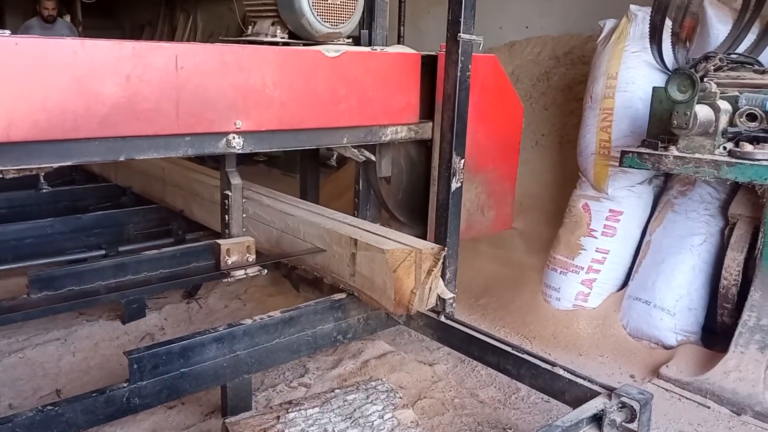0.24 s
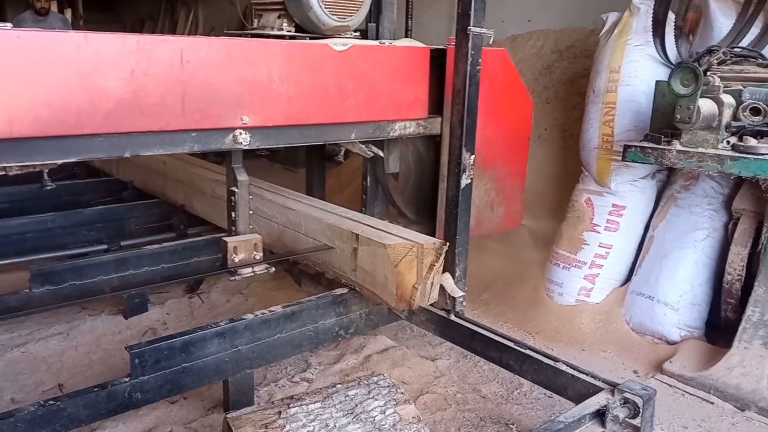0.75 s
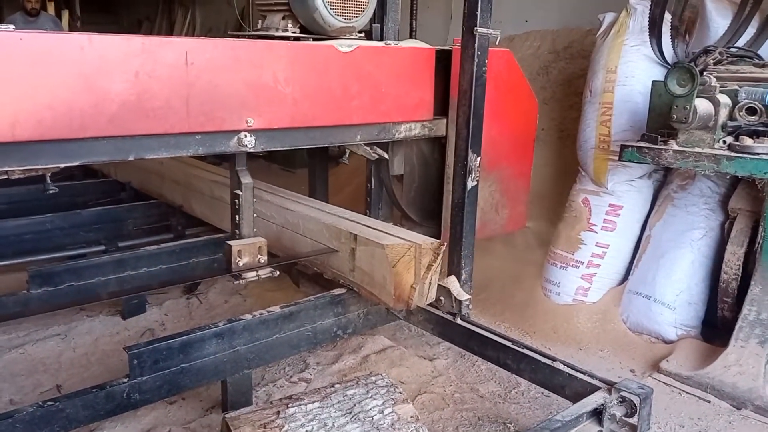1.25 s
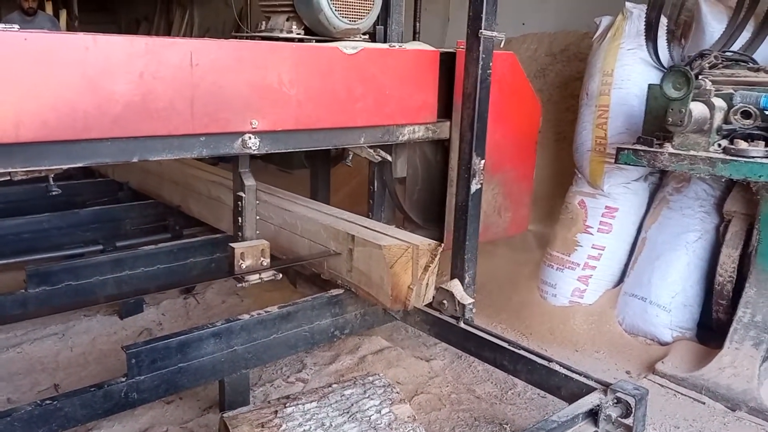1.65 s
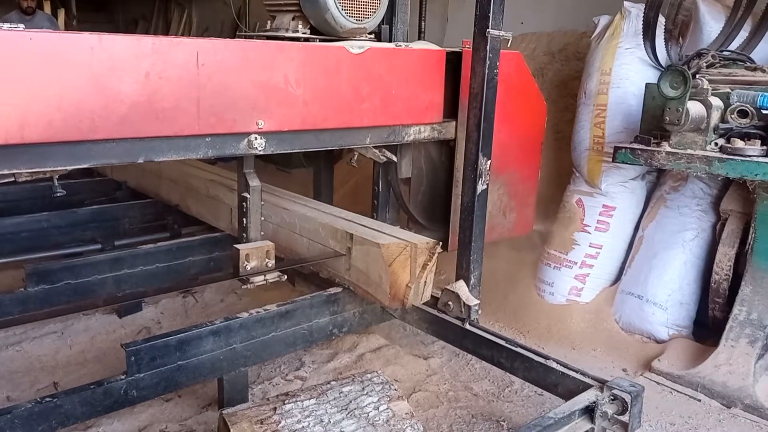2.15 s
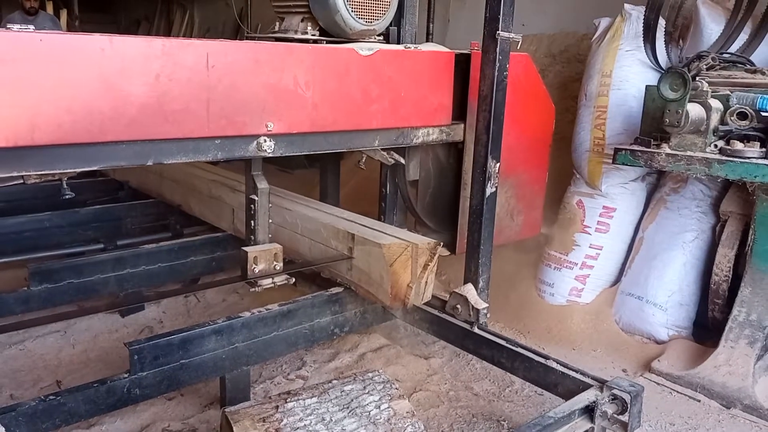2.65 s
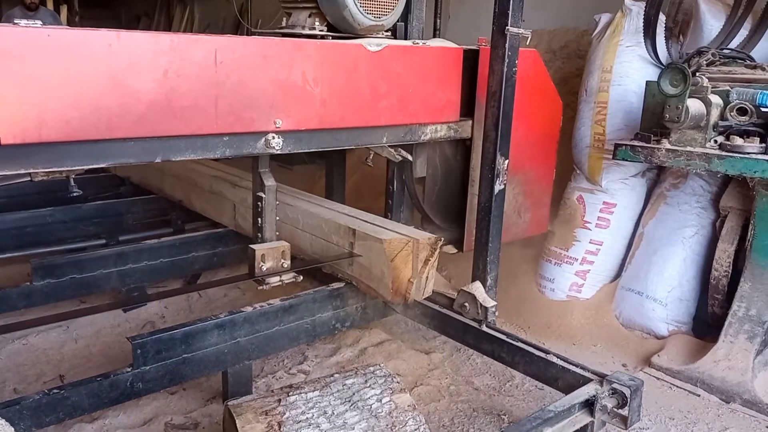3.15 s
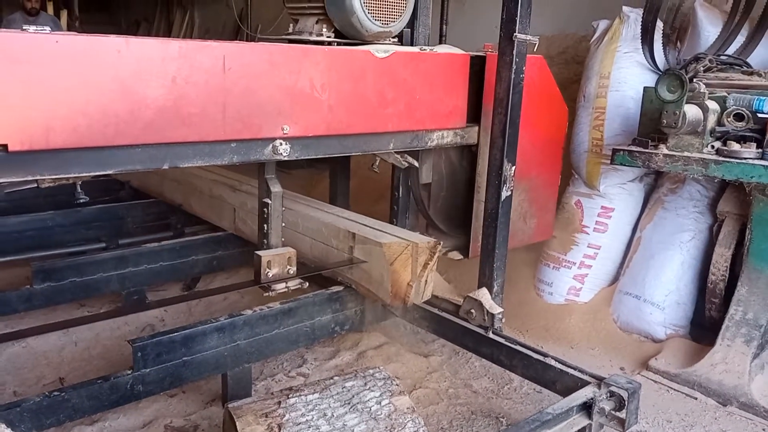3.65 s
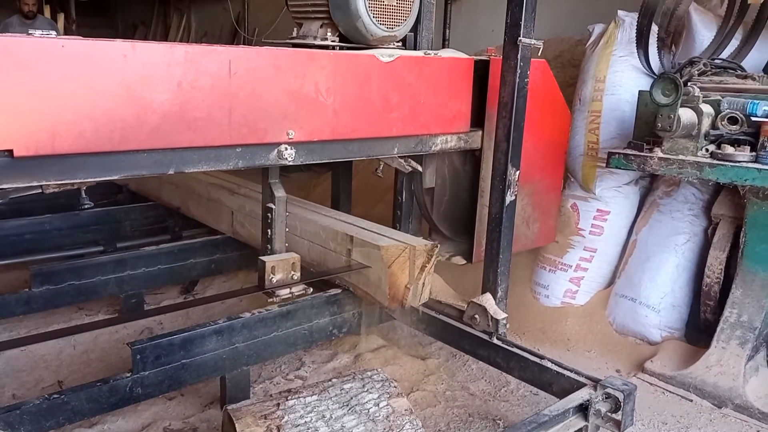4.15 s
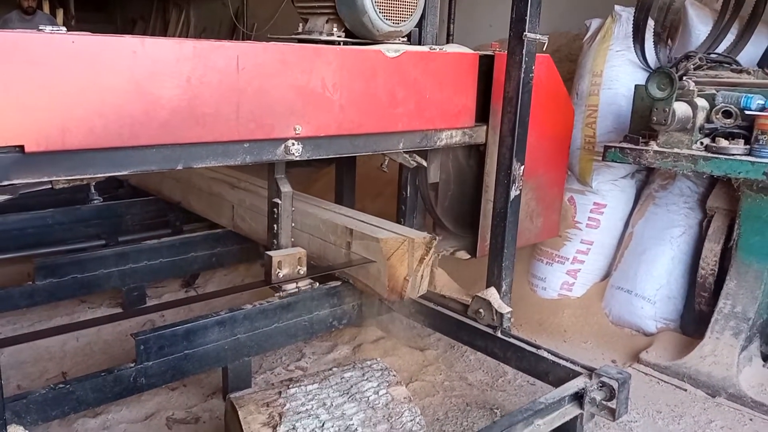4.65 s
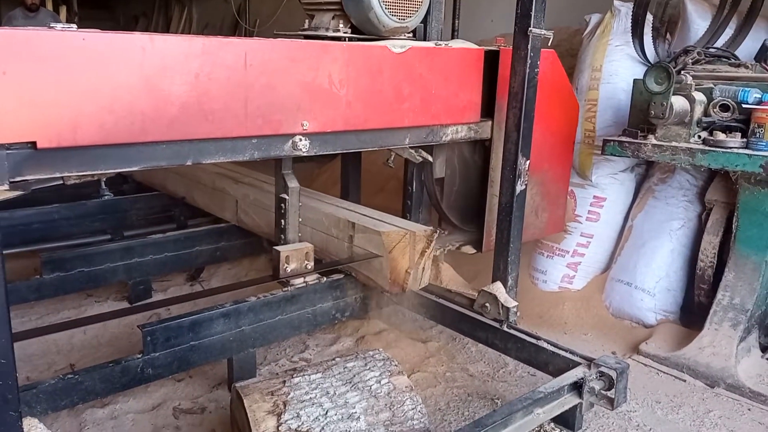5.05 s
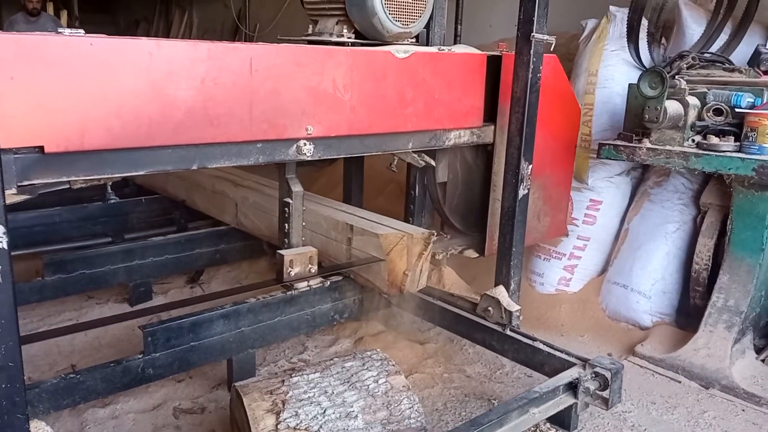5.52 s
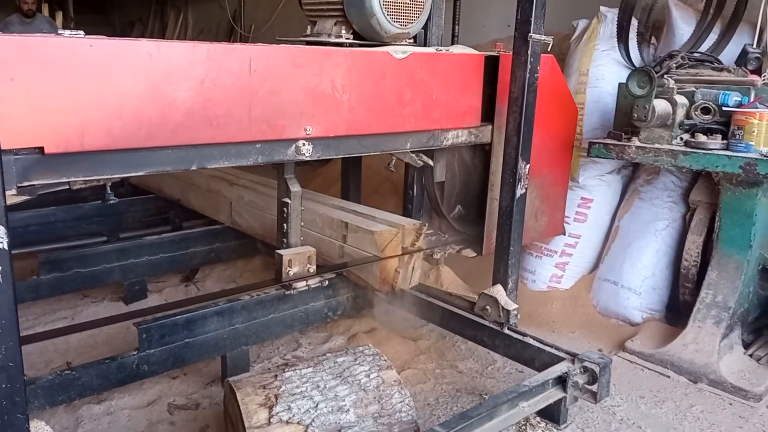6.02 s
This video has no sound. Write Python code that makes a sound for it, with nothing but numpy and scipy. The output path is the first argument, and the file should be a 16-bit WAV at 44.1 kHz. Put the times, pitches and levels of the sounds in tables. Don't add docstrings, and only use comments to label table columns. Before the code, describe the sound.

Constant loud band saw noise, close and nearly mono: harsh rough hiss, flickering high squeals, a nasal metallic ring from the wheel guard, and rumbling motor beneath. The cut stays steady, then gets sharper and more sizzling as the wood thins. It swells as the log splits, and in the last instant the pitch rises slightly, the fine hiss fades and the freed blade flutters.

```python
import sys
import numpy as np
from scipy import signal
from scipy.fft import rfft, irfft
from scipy.io import wavfile
from scipy.ndimage import uniform_filter1d, map_coordinates

SR = 44100
rng = np.random.default_rng(int(sys.argv[2]) if len(sys.argv) > 2 else 0)


def persist_wave(psi):
    counts = np.round(np.clip(psi, -1, 1) * 32767).astype(np.int16)
    wavfile.write(sys.argv[1], SR, np.atleast_2d(counts).T)


def attenuation_scalar(level_db):
    decades = np.asarray(level_db, float) / 20
    return 10 ** decades


N = 276948
TIME = np.arange(N) / SR
CONTROL_STEP = 32
TEETH_PER_TURN = 34.15
THINNING_S, BREAKOUT_S, EXIT_S = (2.7, 4.3), (5.65, 5.95), 6.01


def rms_one(x):
    return x / np.sqrt(np.mean(x ** 2) + 1e-20)


def in_time(rows):
    s, value = np.transpose(rows)
    return np.interp(TIME, s, value)


def at_hz(points, hz):
    point_hz, level_db = np.transpose(points)
    return np.interp(np.log(hz), np.log(point_hz), level_db)


def smooth(slow):
    return np.interp(np.arange(N) / CONTROL_STEP, np.arange(len(slow)), slow)


def drift(rate):
    warm_up = 2000
    r = np.exp(-2 * CONTROL_STEP * np.pi * rate / SR)
    noise = rng.standard_normal(N // CONTROL_STEP + 2 + warm_up)
    return rms_one(signal.lfilter([1], [1, -2 * r, r * r], noise)[warm_up:])


def swells(rows):
    t = np.arange(N // CONTROL_STEP + 2) * CONTROL_STEP / SR
    return smooth(sum(db * np.exp(-(2 * (t - s) / length) ** 4) for s, length, db in rows))


def ramp(start_s, end_s):
    return np.clip((TIME - start_s) / (end_s - start_s), 0, 1)


def along_cut(steady_db, thin_db, breakout_db, fall_db_per_s):
    inside_db = steady_db + thin_db * ramp(*THINNING_S) + breakout_db * ramp(*BREAKOUT_S)
    return inside_db - fall_db_per_s * np.maximum(TIME - EXIT_S, 0)


def coloured(x, spectrum):
    hz = np.maximum(np.fft.rfftfreq(N, 1 / SR), 1)
    return irfft(rfft(x) * attenuation_scalar(at_hz(spectrum, hz)), N)


def band(x, low_hz, high_hz):
    return signal.sosfilt(signal.butter(3, [low_hz, high_hz], "band", fs=SR, output="sos"), x)


def resonate(x, hz, width_hz):
    r = np.exp(-np.pi * width_hz / SR)
    poles = [1, -2 * r * np.cos(2 * np.pi * hz / SR), r * r]
    return signal.lfilter([(1 - r * r) / 2, 0, (r * r - 1) / 2], poles, x)


def resonate_twice(x, hz, width_hz):
    return resonate(resonate(x, hz, width_hz), hz, width_hz)


def wheel_turns(per_s):
    return np.cumsum(per_s) / SR / TEETH_PER_TURN


# pitch_hz, level_db.
FIBRES = [(880, -28), (1500, 1.5), (2080, -2), (2550, -8), (2660, -9), (2860, -7.5), (3210, -6.5),
          (3430, -3.5), (3780, -1), (4530, -5), (5380, -6), (6930, -2.5), (8090, -6.5), (9150, -2.5),
          (10600, -9.5), (13800, -41), (22000, -120)]
DUST = [(10900, -10), (11300, -7.5), (12000, -9), (12850, -8), (13050, -15), (13600, -16), (14100, -12),
        (14800, -9.5), (15700, -3.5), (16500, -3.5)]
HISS = FIBRES[:-3] + [(10550, -9.0)] + DUST
# pitch_hz, level_db.
TOOTH_OVER_HISS = [(600, 17), (1700, 15.5), (2500, 16), (3500, 17), (6000, 20), (9000, 21.5), (11000, 26),
                   (13500, 27), (15500, 26)]
STRONG_PARTIALS = {2: 2.5, 8: 13.2, 10: -3.1, 11: 2.7, 12: 6.1, 14: 5.5, 22: 11.3, 25: 4.1, 26: 6.7, 27:
                   1.1, 30: 1.9, 37: 1}
BURSTS = {8: [(.23, 0.21, 8), (.55, .15, -4), (.745, 0.057, 7), (.84, 0.058, 8), (1.21, 0.14, -7),
          (2.33, .2, 2.5), (2.69, .15, -6), (3.85, 0.15, 2.5), (4.35, 0.62, -7), (5.0, .2, -3),
          (5.3, .2, -9), (5.58, .2, 1), (5.95, 0.27, 1.5)], 11: [(1.06, 0.072, 7), (1.28, 0.1, 6),
          (2.7, 0.084, 10.5), (2.3, 0.35, -1), (4.05, .12, 6), (5.47, .12, 4)], 12: [(.04, .1, 8.5),
          (.95, 0.077, 8), (1.76, .2, 4), (4.8, .13, 10), (5.9, .15, 1)], 14: [(.8, 0.46, -8),
          (5.15, .15, 6), (5.7, 0.18, 4)], 9: [(5.68, .15, 13)], 6: [(5.82, .12, 13)], 17: [(2.2, 1.0, 4)],
          16: [(1.8, 0.46, 9)], 21: [(1.0, 2.0, 7)], 22: [(4.8, 4.7, -6)]}
# steady_db, thin_db, breakout_db, fall_db_per_s.
SINGING_DB = (-3.5, 8, 6, 30.0)
# pitch_hz, level_db.
TEETH_OUT_DB = [(2800, 0.5), (4500, -12), (9000, -9)]


def teeth(per_s, waver, own_waver, flicker_db):
    strokes = np.cumsum(per_s * (1 + waver * smooth(drift(14.2)))) / SR
    sung_db = {k: swells(rows) for k, rows in BURSTS.items()}
    sung_db.update({k: along_cut(*SINGING_DB) for k in (26, 27, 30)})
    out = np.zeros(N)
    for k in range(2, 47):
        hz = k * np.median(per_s)
        level_db = at_hz(HISS, hz) + at_hz(TOOTH_OVER_HISS, hz) + STRONG_PARTIALS.get(k, 0)
        swell = drift(18) + 0.51 * drift(0.95)
        depth_db = flicker_db * (0.6 if k in sung_db else 1.1)
        gain = smooth(attenuation_scalar(level_db + depth_db * swell))
        if k in sung_db:
            gain *= attenuation_scalar(sung_db[k])
        leaving = ramp(*BREAKOUT_S) if k > 31 else ramp(EXIT_S, EXIT_S + 0.06)
        gain *= attenuation_scalar(at_hz(TEETH_OUT_DB, hz) * leaving)
        wander = smooth(own_waver * k * drift(12.3))
        out += gain * np.sin(2 * np.pi * (k * strokes + rng.random()) + wander)
    return out


# steady_db, thin_db, breakout_db, fall_db_per_s.
BITE_DB = (-28, 0.8, 3, 4)
SQUEAL_DB = (-32, 0, -0.5, 12)
DUST_DB = (-33.7, 1.5, 0.5, 51)


def cut(per_s, patchy_db):
    hiss = coloured(rng.standard_normal(N), HISS) * np.sqrt(SR / 2)
    tones = teeth(per_s, waver=0.001, own_waver=0.06, flicker_db=2.8)
    spectrum, hz = rfft(hiss + tones), np.fft.rfftfreq(N, 1 / SR)
    squeal_db = along_cut(*SQUEAL_DB) - 2.5 * ramp(EXIT_S, EXIT_S + 0.038)
    bands = [(along_cut(*BITE_DB), 2000, 7500), (squeal_db, 7700, 10500), (along_cut(*DUST_DB), 11000, 15700)]
    controls = []
    for control_db, low, high in bands:
        power = 2 * np.sum(np.abs(spectrum[(hz > low) & (hz < high)]) ** 2) / N ** 2
        controls.append(uniform_filter1d(control_db, size=3000) - 10 * np.log10(power))
    chips = drift(31) + 1.4 * drift(36)
    edges = np.r_[0, np.geomspace(2000, 14000, 13), SR / 2]
    out = np.zeros(N)
    for low, high in zip(edges, edges[1:]):
        place = np.interp(high, [7500, 9000, 10500, 13000], [0, 1, 1, 2])
        level_db = sum(max(1 - abs(place - i), 0) * c for i, c in enumerate(controls))
        level_db += 1.2 * place * ramp(EXIT_S, EXIT_S + 0.08)
        if low < 13000 < high:
            level_db -= 22.0 * np.maximum(TIME - 5.85, 0)
        depth_db = patchy_db * np.interp(high, [2000, 14000], [0.4, 1.1])
        flicker = smooth(0.2 * chips + 0.44 * drift(50))
        zone = irfft(spectrum * ((hz >= low) & (hz < high)), N)
        out += attenuation_scalar(level_db + depth_db * flicker) * zone
    return out


def wheels(per_s, fresh, renew_s):
    spots = 4434
    patterns = rng.standard_normal((int(TIME[-1] / 0.2) + 3, spots))
    spot = wheel_turns(per_s) % 1 * (spots - 1)
    age = TIME / max(renew_s, 0.2)
    share = age % 1 * np.pi / 2
    old, new = [map_coordinates(patterns, [age.astype(int) + i, spot], order=1) for i in (0, 1)]
    repeating = old * np.cos(share) + new * np.sin(share)
    return repeating + fresh * rng.standard_normal(N)


# pitch_hz, width_hz, level_db, group.
GUARD_MODES = [(1256, 12, 0, 0), (1274, 12, -1, 0), (1303, 14, 0, 1), (1323, 10, -1, 2), (1338, 16, 0, 2),
               (1364, 14, -4, 2), (1395, 9, 0, 3), (1442, 16, -4, 3), (1466, 20, -6, 3), (1580, 24, -10, 3),
               (1604, 16, -10, 3)]
GROUP_DB = [-.2, 1.6, 1.3, -1.2]
# centre_s, length_s, level_db.
GROUP_SWELLS = [
    [(1.7, 0.55, -1), (2.6, .3, 2), (4.7, .2, -12), (5.85, 0.22, 5)],
    [(2.5, 1.0, 3.5), (6.1, 0.45, -8)],
    [(1.7, 0.23, 4.4), (4.15, 0.28, 0.97)],
    [(.15, 0.41, 3.5), (2.3, .3, 0.5), (2.62, .12, -6), (6.05, 0.22, -11)],
]
WHEEL_ORDERS = {1: 130, 2: 136}
ORDER_SWELLS = {1: [(1.0, 1.1, -9.5), (2.45, 0.64, 7.5), (3.2, .7, 7), (5.0, 2.7, 8), (6.1, 0.44, -4)],
                2: [(1.0, 0.99, -3), (2.3, 0.33, 2), (3.65, 0.43, -4), (4.9, 1, -4.5), (5.6, 0.13, 2)]}
# start_s, level_db.
SHAKE = [(0.0, -29.5), (0.55, -24), (0.78, -30.5), (1.45, -28.5), (1.68, -29.5), (1.95, -29.5), (2.3, -27),
         (2.8, -28), (3.5, -26.5), (3.78, -29.5), (4.12, -28), (4.42, -31), (4.58, -27), (4.72, -30.5),
         (5.1, -29), (5.4, -31.5), (5.7, -31.5), (6.2, -25)]


def guard(per_s, rattle):
    share_db = [-6, -10.5, -5, -10]
    turns, shake_db = wheel_turns(per_s), in_time(SHAKE)
    out = np.zeros(N)
    for group, rows in enumerate(GROUP_SWELLS):
        ring_db = shake_db + share_db[group] + swells(rows) + 1.72 * smooth(drift(4.3))
        modes = np.zeros(N)
        for hz, width, db, member in GUARD_MODES:
            if member == group:
                modes += attenuation_scalar(db) * resonate(resonate(rattle, hz, width), hz, 2 * width)
        modes = rms_one(modes)
        modes /= np.sqrt(uniform_filter1d(modes ** 2, size=15000))
        if group in WHEEL_ORDERS:
            swell = smooth(attenuation_scalar(4.0 + 1.9 * drift(3.7))) * attenuation_scalar(swells(ORDER_SWELLS[group]))
            wander = smooth(0.8 * drift(4))
            modes += swell * np.sin(2 * np.pi * WHEEL_ORDERS[group] * turns + wander)
        out += attenuation_scalar(ring_db + GROUP_DB[group]) * rms_one(modes)
    return out


# pitch_hz, level_db.
FRAME = [(26, -57), (45, -36), (65, -18), (107, -16), (152, -4.5), (366, -13), (456, -7.5), (530, -7.5),
         (678, 0.5), (737, -3), (1100, -3), (1190, 3), (1550, -32), (2620, -120)]
# pitch_hz, width_hz, level_db over the rumble.
PANELS = [(161, 14, 3.5), (201, 10, 4.5), (298, 16, 4.5), (445, 16, 3.5), (475, 14, 3.5), (793, 20, 3.5)]
# steady_db, thin_db, breakout_db, fall_db_per_s (minus = rise).
RUMBLE_DB = (-36.5, -0.4, 0.5, -7)
THRUM_DB = (-48.5, 1.5, -0.8, -26)


def frame(rattle):
    rumble = coloured(rattle, FRAME[:-3] + [(1200, -3.0), (1500, -13.5), (2100, -8.0), (2800, -23)])
    for hz, width, db in PANELS:
        rumble += (attenuation_scalar(db) - 1) * resonate(rumble, hz, width)
    split_hz = 360
    thrum = signal.sosfilt(signal.butter(4, split_hz, fs=SR, output="sos"), rumble)
    rest = signal.sosfilt(signal.butter(4, split_hz, "high", fs=SR, output="sos"), rumble)
    thrum *= attenuation_scalar(along_cut(*THRUM_DB) - 1.2) / np.std(band(rumble, 120, 225))
    rest *= attenuation_scalar(along_cut(*RUMBLE_DB) - 0.4) / np.std(band(rumble, 400, 1100))
    return thrum + rest


# pitch_hz, level_db.
HUM_HZ = [(79.58, 0), (80.14, -3.5)]
# steady_db, thin_db, breakout_db, fall_db_per_s (minus = rise).
HUM_DB = (-60.0, -0.3, 0, -25)


def hum(per_s):
    null_s = 1.8
    clock = np.cumsum(per_s / np.median(per_s)) / SR - null_s
    (low_hz, low_db), (high_hz, high_db) = HUM_HZ
    low = attenuation_scalar(low_db) * np.sin(2 * np.pi * low_hz * clock)
    high = attenuation_scalar(high_db) * np.sin(2 * np.pi * high_hz * clock)
    return attenuation_scalar(along_cut(*HUM_DB)) * (low - high)


def log_drum():
    return attenuation_scalar(-49.5) * (1 - ramp(1.3, 1.9)) * rms_one(band(rng.standard_normal(N), 327, 424))


def scratch():
    sizzle = rms_one(resonate_twice(rng.standard_normal(N), hz=8920, width_hz=500))
    level_db = along_cut(steady_db=-54.5, thin_db=12.5, breakout_db=-1, fall_db_per_s=80.0)
    return attenuation_scalar(level_db + 6.4 * smooth(drift(25.0))) * sizzle


# pitch_hz, width_hz, level_db.
FREE_BLADE = [(1530, 32, -38), (3720, 120, -33.5), (3900, 280, -34.5), (6500, 210, -51)]


def free_blade():
    shake = rng.standard_normal(N)
    rings = sum(attenuation_scalar(db) * rms_one(resonate_twice(shake, hz, width)) for hz, width, db in FREE_BLADE)
    return ramp(EXIT_S - 0.05, EXIT_S + 0.1) * rings


def bed_knock():
    return attenuation_scalar(-38.0) * ramp(6.1, 6.186) * rms_one(band(rng.standard_normal(N), 224, 337))


# start_s, teeth_per_s.
SPEED = [
    (0.0, 339.6),
    (3.43, 339.6),
    (4.6, 340.8),
    (5.84, 340.8),
    (5.98, 345.0),
    (6.12, 350.0),
    (6.28, 352.5),
]


def scene():
    per_s = in_time(SPEED)
    sound = cut(per_s, patchy_db=2.62)
    sound += guard(per_s, wheels(per_s, fresh=0.7, renew_s=1.5))
    sound += frame(wheels(per_s, fresh=0.95, renew_s=1.597))
    sound += hum(per_s) + log_drum() + scratch() + free_blade() + bed_knock()
    return np.array([sound, sound])


def top_cut(x):
    return signal.sosfilt(signal.butter(12, 17130, fs=SR, output="sos"), x)


# centre_s, low_hz, high_hz, level_db.
SIDE_FLECKS = [(.416, 5700, 7000, -39), (.742, 13800, 15200, -42), (1.02, 5100, 6400, -40),
               (4.224, 14500, 15900, -39), (4.386, 13100, 15300, -40), (5.153, 8300, 9700, -36),
               (5.617, 6300, 7700, -36), (5.64, 5100, 6900, -37), (5.734, 4200, 5300, -38),
               (5.734, 13100, 14600, -41)]


def record(dry):
    side, span = np.zeros(N), 2048
    hz, t = np.fft.rfftfreq(span, 1 / SR), (np.arange(span) - span // 2) / SR
    fade = np.clip((0.0135 - np.abs(t)) / 0.0033, 0, 1)
    for s, low_hz, high_hz, db in SIDE_FLECKS:
        noise = rms_one(irfft(rfft(rng.standard_normal(span)) * ((hz > low_hz) & (hz < high_hz))))
        start = round(s * SR) - span // 2
        side[start:start + span] += attenuation_scalar(db) * fade * noise
    cutoff_hz = 15740
    kept = irfft(rfft(dry) * (np.fft.rfftfreq(N, 1 / SR) < cutoff_hz), N)
    kept = signal.sosfilt(signal.butter(3, 45, "high", fs=SR, output="sos"), kept)
    return top_cut(kept + side * [[1], [-1]])


dry = scene()
out = record(dry)
persist_wave(out)
```